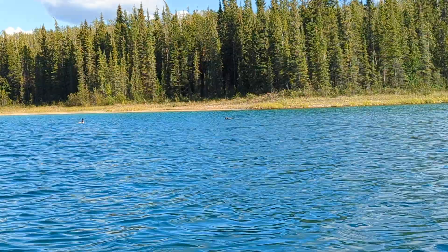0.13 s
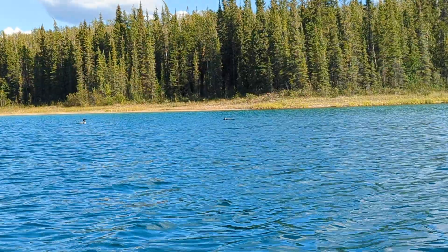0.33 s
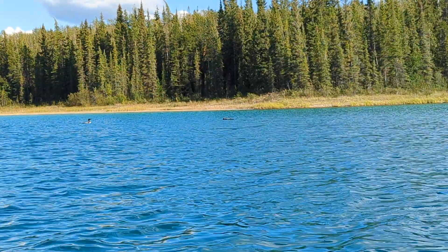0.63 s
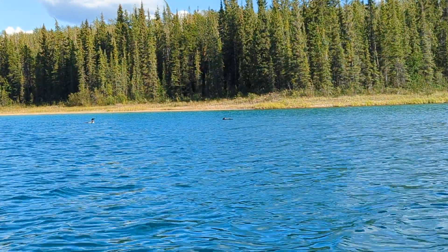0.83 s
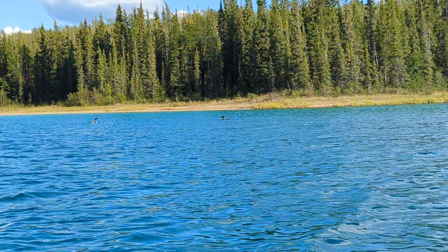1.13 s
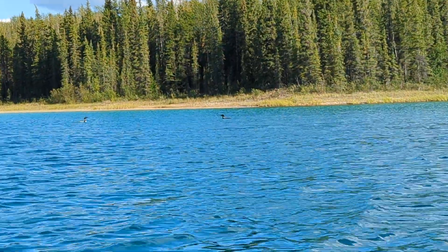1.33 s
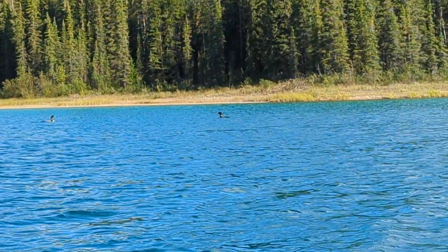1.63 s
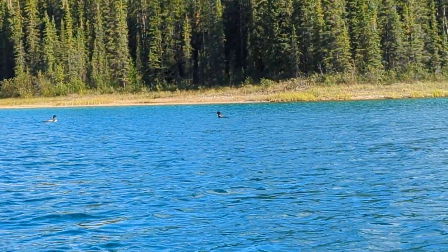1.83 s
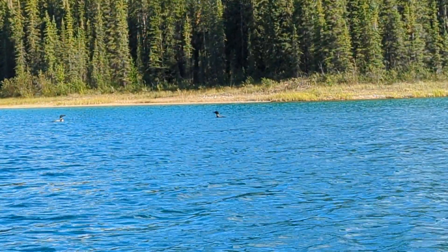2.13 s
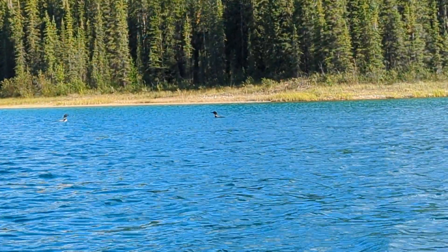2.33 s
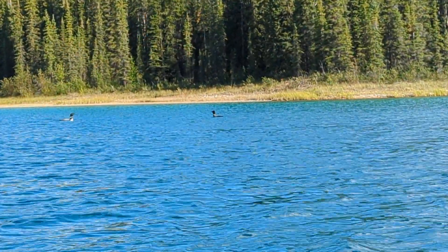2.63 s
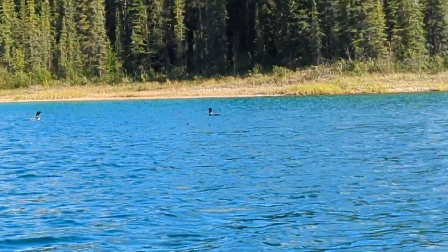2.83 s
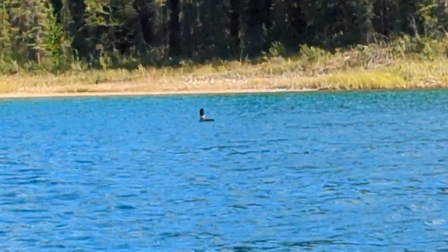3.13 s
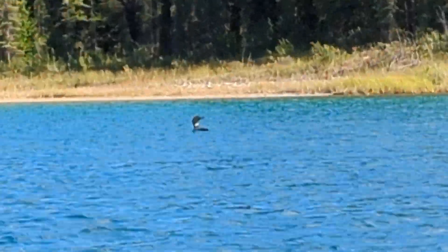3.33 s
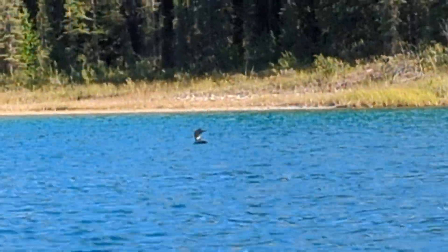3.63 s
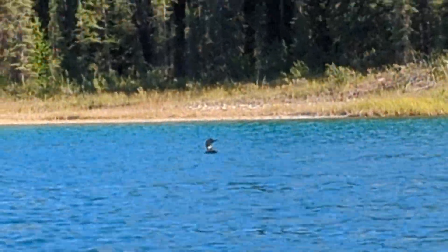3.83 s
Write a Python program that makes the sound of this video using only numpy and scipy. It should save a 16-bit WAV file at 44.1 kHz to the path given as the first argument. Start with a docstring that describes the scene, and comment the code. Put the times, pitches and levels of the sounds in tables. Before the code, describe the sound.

Three loon tremolos ring over open water, with low wind buffeting the microphone.

```python
"""Forest lake: loons call three tremolos, the middle one probably a second bird from more straight ahead.
A long faint echo returns from the wooded shore: the calls through decaying noise.
Voices: two registers of wavering sine partials plus air. Wind: noise bands and pulse runs, separate at
the two microphone ports; slaps: ringing clicks, mostly right. Water at the boat: gliding sines and
noise puffs; close brush: dense bright grains with snaps; faint hiss."""
import sys
import numpy as np
from scipy import signal
from scipy.fft import rfft, irfft
from scipy.io import wavfile
from scipy.ndimage import uniform_filter1d

SR = 44100
rng = np.random.default_rng(int(sys.argv[2]) if len(sys.argv) > 2 else 0)


def generate_wav(sig):
    """Save sig (samples, or channels by samples) to the path in sys.argv[1] as 16-bit PCM at SR."""
    pcm = np.round(np.clip(np.atleast_2d(sig).T, -1, 1) * 32767).astype(np.int16)
    wavfile.write(sys.argv[1], SR, pcm)


def linear_from_db(decibels):
    """Turn decibels (scalar or array-like) into linear amplitude factors; 0 gives 1."""
    return 10 ** (np.asarray(decibels, float) / 20)


N = 176400

# hiss spectrum: f/Hz, relative level/dB per Hz
HISS_SPECTRUM = [(820, -24), (1400, -3), (3550, -11.5), (6190, -12), (8050, -16), (12300, -18),
                 (15700, -17)]
# swells of the hiss, before flutter: start t/s, length/s, level/dB
HISS_SWELLS = [(0.557, 0.2, -78), (1.1, 3.13, -89)]
# wind at the ports: t/s, relative level/dB, left-right/dB
GUSTS = [(0.0, -49, -2), (0.02, -38, -8.5), (1.41, -51, 10), (1.85, -41, -18), (2.32, -51, 14.5),
         (3.09, -41.5, -15), (3.45, -44, 7.5), (4.0, -39.5, -12)]
# wind spectrum: f/Hz, relative level/dB per Hz
WIND_SPECTRUM = [(20, -25.5), (64, 6), (170, 5), (344, -18), (730, -45), (1200, -23), (1700, -67.5)]
# eddies bursting over one port, before panning: start t/s, length/s, level/dB, left-right/dB
BUFFETS = [(-0.02, 0.11, -42.5, -18.5), (0.168, 0.014, -32, -13), (0.291, 0.074, -44, -22),
           (0.422, 0.086, -41.5, -17), (0.703, 0.039, -46.5, 17.5), (0.881, 0.062, -55.5, -10),
           (1.696, 0.23, -53, -20.5), (2.944, 0.052, -51, -9.5), (3.083, 0.17, -42.5, -11.5),
           (3.23, 0.21, -54, 11), (3.516, 0.16, -45.5, 7.5), (3.724, 0.08, -39.5, -3.5),
           (3.84, 0.1, -45, -11.5)]
# eddy spectrum: f/Hz, relative level/dB per Hz
EDDY_SPECTRUM = [(30, -40), (70, -6), (150, 0.0), (320, -3.5), (600, -17), (1200, -40), (4500, -88)]
# hardest slaps of air: t/s, drive level before ringing and panning/dB
SLAPS = [(0.027, -44.5), (0.035, -31.5), (0.32, -28), (0.351, -32), (0.454, -30.5), (1.935, -38),
         (3.147, -29), (3.169, -30), (3.846, -34), (3.902, -30), (3.925, -33)]
# bubbles at the hull, before panning: t/s, length/s, peak level/dB, start f/Hz, end f/Hz
BUBBLES = [(0.57, 0.027, -67, 1040, 1090), (0.881, 0.023, -67, 1200, 1110), (0.876, 0.018, -60.5, 586, 650),
           (1.014, 0.012, -70, 1010, 1300), (1.05, 0.021, -74, 780, 1050)]
# small splashes, before panning: t/s, length/s, level/dB, f/Hz
SPLASHES = [(0.624, 0.028, -76, 2200), (2.502, 0.012, -58.5, 1620), (3.421, 0.027, -69, 2180)]
# brush spectrum: f/Hz, relative level/dB per Hz
BRUSH_SPECTRUM = [(900, -11.5), (4600, -14), (8500, -6.5), (12800, -3), (15500, -3.5)]
# fibres snapping during the brush: t/s, level of the shared grain before panning/dB
SNAPS = [(0.2974, -46), (0.3026, -44), (0.3069, -30.5), (0.3102, -36)]
# low register at crests and troughs, one list per stretch: t/s, pitch f/Hz, partial 1 rms/dB, partial 2 rms/dB
LOW_VOICE = [
    [(1.095, 657, -65, -68), (1.135, 752, -48, -48.5), (1.185, 650, -59, -63), (1.243, 834, -47, -45)],
    [(1.512, 629, -65.5, -68), (1.61, 617, -71.5, -84.5)],
    [(1.76, 676, -62.5, -61.5), (1.79, 789, -50.5, -39), (1.836, 643, -60.5, -59.5),
     (1.88, 890, -42.5, -33)],
    [(2.166, 730, -52.5, -51), (2.198, 792, -47.5, -41), (2.27, 588, -69.5, -74)],
    [(2.515, 715, -60.5, -55), (2.542, 767, -47, -43), (2.583, 702, -46.5, -60.5),
     (2.614, 835, -44.5, -47.5)],
    [(2.992, 663, -63.5, -78), (3.035, 608, -65, -83)],
]
# high register at crests and troughs, one list per stretch: t/s, pitch f/Hz, partial 1 rms/dB
HIGH_VOICE = [
    [(1.236, 1234, -41.5), (1.288, 935, -44), (1.338, 1227, -30.5), (1.394, 933, -43.5),
     (1.444, 1173, -33.5), (1.489, 950, -42), (1.515, 927, -57)],
    [(1.879, 1291, -32), (1.933, 983, -44), (1.982, 1292, -31.5), (2.035, 950, -46), (2.085, 1282, -30),
     (2.14, 950, -47), (2.168, 950, -59.5)],
    [(2.608, 1191, -38), (2.632, 1237, -30.5), (2.678, 980, -38.5), (2.726, 1252, -27),
     (2.778, 974.6, -35.5), (2.824, 1228, -27), (2.87, 957, -39), (2.893, 969, -41.5), (2.93, 1120, -31),
     (2.974, 951, -42.5), (3.0, 906, -55)],
]
# low overtones, before the bill: multiple of pitch, level re partial 2/dB
LOW_OVERTONES = [(3, -22.5), (4, -39.5), (5, -44), (6, -33.5), (7, -44.5), (8, -43), (9, -47)]
# high overtones, before following and bill: multiple of pitch, level re partial 1/dB
HIGH_OVERTONES = [(2, -24.5), (3, -48.5), (4, -56), (5, -54)]
# high voice repeats only every third cycle: start t/s, length/s, level of the thirds re partial 1/dB
TRIPLED = [(1.233, 0.017, -25.5), (1.333, 0.03, -28.5), (2.613, 0.037, -20), (2.728, 0.028, -23.5),
           (2.82, 0.027, -24.5)]
# partials of the tripled cycle, before the bill: multiple of pitch/3, relative level/dB
THIRDS = [(2, -1.5), (4, -1.5), (5, 2), (11, -26)]
# bill, call by call: last t/s, resonance f/Hz, overtones above about 3 kHz/dB, lag at right port/s
BILL = [(1.7, 4480, -8.5, .00008), (2.4, 5950, -3, 0.00003), (4.0, 4400, -2, 0.000068)]
# air in the voice: f/Hz, relative level/dB per Hz
BREATH_SPECTRUM = [(700, -12.5), (2000, -1), (3500, -11.5), (6500, -15.5), (15500, -32.5)]

SMOOTH_S = 0.0055


def rms_one(x):
    """Scale to rms 1."""
    return x / np.sqrt(np.mean(x ** 2) + 1e-20)


def at_hz(points, hz):
    """Read a spectrum on a log frequency axis."""
    points_hz, points_db = np.transpose(points)
    return np.interp(np.log(hz), np.log(points_hz), points_db)


def in_time(rows):
    """Columns of a curve per sample, corners rounded."""
    s, *columns = np.transpose(rows)
    t = np.arange(N) / SR
    return [uniform_filter1d(np.interp(t, s, c), int(SMOOTH_S * SR)) for c in columns]


def wavering(rows):
    """Columns per sample, joined by arches: round at the crests, narrower at the troughs."""
    roundness = 1.7   # 2 = sine-like, 1 = pointed troughs
    s, *columns = np.transpose(rows)
    place = np.interp(np.arange(N) / SR, s, np.arange(len(s)))
    k = np.minimum(place.astype(int), len(s) - 2)
    rising = columns[0][k + 1] > columns[0][k]
    height = np.sin(np.pi / 2 * np.where(rising, place - k, 1 - place + k)) ** roundness
    share = np.where(rising, height, 1 - height)
    return [uniform_filter1d(c[k] + share * (c[k + 1] - c[k]), int(SMOOTH_S * SR)) for c in columns]


def gate(start_s, length_s, edge_s):
    """1 within the span, with soft edges."""
    t = np.arange(N) / SR
    inside_s = np.minimum(t - start_s, start_s + length_s - t)
    return np.sin(np.pi / 2 * np.clip(inside_s / edge_s + .5, 0, 1)) ** 2


def drift(rate_hz):
    """Slow chance, spread 1: noise through two equal poles, run at SR / 40."""
    r = np.exp(-80 * np.pi * rate_hz / SR)
    slow = signal.lfilter([1], [1, -2 * r, r * r], rng.standard_normal(N // 40 + 2002))
    slow = slow[2000:]   # settled part
    return np.interp(np.arange(N) / 40, np.arange(len(slow)), rms_one(slow))


def coloured(x, spectrum):
    """Give a white signal a spectrum; rms 1."""
    hz = np.maximum(np.arange(N // 2 + 1) * SR / N, 1)
    return rms_one(irfft(rfft(x) * linear_from_db(at_hz(spectrum, hz)), N))


def band_passed(x, order, edges_hz):
    """Butterworth band-pass."""
    return signal.sosfilt(signal.butter(order, edges_hz, "band", fs=SR, output="sos"), x)


def sides(pan_db):
    """Left and right gains, pan_db apart."""
    return linear_from_db(np.array([[.5], [-.5]]) * pan_db)


def placed(x, pan_db, lag_s):
    """Pan by level; the right side is delayed."""
    hz = np.arange(N // 2 + 1) * SR / N
    late = irfft(rfft(x) * np.exp(-2j * np.pi * hz * lag_s), N)
    return np.array([x, late]) * sides(pan_db)


def hiss():
    """Lake and microphone: steady coloured noise plus fluttering swells."""
    swells = sum(linear_from_db(db) * gate(s, length_s, .5 * length_s) for s, length_s, db in HISS_SWELLS)
    level = linear_from_db(-84.5) + swells * linear_from_db(3.0 * drift(30))
    return level * coloured(rng.standard_normal((2, N)), HISS_SPECTRUM)


def shore(calls):
    """Scattering from trees: dying tail, swell from the far bank, remnant of an earlier call."""
    echo_db, echo_t60_s, echo_rise_s, echo_cut_hz = -35, 6.7, 0.087, 3300
    far_s, far_width_s, far_db = 0.67, 0.13, -3
    earlier_db, earlier_t60_s, earlier_hz = -78.5, 12, (950, 1220)
    t = np.arange(N) / SR
    shape = linear_from_db(-60 * t / echo_t60_s) * (1 - np.exp(-t / echo_rise_s))
    shape += linear_from_db(far_db) * np.exp(-((t - far_s) / far_width_s) ** 2)
    tail = signal.lfilter(*signal.butter(1, echo_cut_hz, fs=SR), rng.standard_normal((2, N)) * shape)
    tail = linear_from_db(echo_db) * tail / np.sqrt(np.sum(tail ** 2) / 2)
    earlier = rms_one(band_passed(rng.standard_normal((2, N)), 4, earlier_hz))
    earlier = earlier * linear_from_db(earlier_db - 60 * t / earlier_t60_s)
    return signal.fftconvolve(tail, calls[None])[:, :N] + earlier


def wind():
    """Lumpy noise in half-octave bands, separate at each port; a stronger gust is brighter."""
    brighten_db_per_oct, lump_db, flicker_db = 0.36, 5, 5   # brightening: per dB of gust
    level_db, pan_db = in_time(GUSTS)
    # hold the mean amplitude of the two ports against panning
    level_db = level_db - 10 * np.log10((linear_from_db(pan_db) + linear_from_db(-pan_db) + 2) / 4)
    out, edges_hz = np.zeros((2, N)), 20 * 2 ** np.arange(0, 7.1, .5)
    for side, sign in enumerate((.5, -.5)):
        gust_db = level_db + sign * pan_db
        lumps, white = drift(3.74), rng.standard_normal((2, N))
        for k, (low_hz, high_hz) in enumerate(zip(edges_hz, edges_hz[1:])):
            band = band_passed(white[k % 2], 2, [low_hz, high_hz])
            octaves = max(np.log2(high_hz / 150), 0)
            db = at_hz(WIND_SPECTRUM, np.sqrt(low_hz * high_hz)) + gust_db + 13.5
            db += brighten_db_per_oct * octaves * (gust_db + 39.5)
            db += lump_db * min(0.23 + 0.19 * octaves, 1.5) * lumps + flicker_db * drift(12.9)
            out[side] += band * linear_from_db(db)
    return signal.sosfilt(signal.butter(4, 920, fs=SR, output="sos"), out)


def buffets():
    """Eddies: runs of soft pulses of uneven size, separate at each port."""
    eddies_per_s, spread_db = 420, 3.5
    struck = rng.random((2, N)) < eddies_per_s / SR
    pulses = struck * linear_from_db(spread_db * np.minimum(rng.exponential(1, (2, N)), 3))
    pulses = pulses * rng.choice([-1, 1], (2, N))
    b, a = signal.butter(1, 400, fs=SR)
    hz = np.maximum(np.arange(N // 2 + 1) * SR / N, 1)
    lagging = np.exp(2j * np.angle(signal.freqz(b, a, hz, fs=SR)[1]))   # sharp front, slower back
    eddies = coloured(irfft(rfft(pulses) * lagging, N), EDDY_SPECTRUM)
    return eddies * sum(linear_from_db(db) * gate(s, length_s, 0.038) * sides(pan_db)
                        for s, length_s, db, pan_db in BUFFETS)


def slaps():
    """Air slapping the right port: each soft pulse rings a cycle or two."""
    ring_hz, t60_s = 330, 0.0075
    clicks = np.zeros(N)
    for s, db in SLAPS:
        clicks[int(s * SR)] = linear_from_db(db)
    r, w = linear_from_db(-60 / (t60_s * SR)), 2 * np.pi * ring_hz / SR
    rung = signal.lfilter([0, np.sin(w)], [1, -2 * r * np.cos(w), r * r], clicks + 1e-18)
    return signal.lfilter(*signal.butter(3, 1000, fs=SR), rung) * sides(-27.0)


def laps():
    """Water: bubbles are short gliding tones, splashes puffs of noise in a narrow band."""
    out, t = np.zeros(N), np.arange(N) / SR
    for s, length_s, db, start_hz, end_hz in BUBBLES:
        hz = np.interp(t, [s, s + length_s], [start_hz, end_hz])
        out += linear_from_db(db) * gate(s, length_s, .5 * length_s) * np.sin(2 * np.pi * np.cumsum(hz) / SR)
    for s, length_s, db, hz in SPLASHES:
        puff = band_passed(rng.standard_normal(N), 2, [hz / 1.06, hz * 1.17])
        out += linear_from_db(db) * gate(s, length_s, .5 * length_s) * rms_one(puff)
    return out * sides(-1.5)


def brush():
    """Close brush: dense bright grains under a rounded stroke, with snaps; partly separate at the ports."""
    start_s, length_s, level_db, snap_s = 0.2897, 0.043, -50, 0.00046
    pan_db, lag_s = 4, 0.00048
    grain = rms_one(linear_from_db(1.5 * drift(450)))
    shared = coloured(rng.standard_normal(N), BRUSH_SPECTRUM)
    apart = coloured(rng.standard_normal((2, N)), BRUSH_SPECTRUM)
    stroke = linear_from_db(level_db) * grain * gate(start_s, length_s, 0.34 * length_s) ** 2
    stroke += sum(linear_from_db(db) * gate(s, snap_s, snap_s) for s, db in SNAPS)
    return stroke * (placed(shared, pan_db, lag_s) + .5 * apart)


def overtones(table, hz, turn, bill_hz, aim_db):
    """Sine partials; the high ones come and go and pass the bill's resonance."""
    width_oct, lift_db, patchy_db, patches_hz = 0.22, 9.5, 6, 18
    out = np.zeros(N)
    for k, db in table:
        high = np.clip(k * hz / 600 - 4.5, 0, 1)   # fades in from 2.7 to 3.3 kHz
        resonance_db = lift_db * np.exp(-(np.log2(k * hz / bill_hz) / width_oct) ** 2)
        up_db = high * (aim_db + patchy_db * drift(patches_hz) + resonance_db)
        out += linear_from_db(db + up_db) * np.sin(round(k) * turn)
    return out


def loons():
    """Voices: two registers of near sines with weak overtones, thirds at the crests, and a little air."""
    edge_s, wobble_db, follow = 0.0048, 1.48, 0.25   # follow: dB overtones sink per dB of high voice
    breath_db, breath_follow, rasp_db = -59.5, 0.42, -52.5   # breath_follow: exponent on effort
    tone, effort = np.zeros(N), np.zeros(N)
    tripled = sum(linear_from_db(db) * gate(s, length_s, 0.015) for s, length_s, db in TRIPLED)
    last_s, resonance_hz, high_db, _ = np.transpose(BILL)
    which = np.minimum(np.searchsorted(last_s, np.arange(N) / SR), len(last_s) - 1)
    bill = resonance_hz[which], high_db[which]
    for rows in LOW_VOICE:
        hz, first_db, second_db = wavering(rows)
        turn = 2 * np.pi * np.cumsum(hz) / SR
        on = gate(rows[0][0], rows[-1][0] - rows[0][0], edge_s)
        upper = np.sin(2 * turn) + overtones(LOW_OVERTONES, hz, turn, *bill)
        tone += on * (linear_from_db(first_db) * np.sin(turn) + linear_from_db(second_db) * upper)
        effort += on * linear_from_db(second_db)
    for rows in HIGH_VOICE:
        hz, level_db = wavering(rows)
        turn = 2 * np.pi * np.cumsum(hz) / SR
        on = gate(rows[0][0], rows[-1][0] - rows[0][0], edge_s)
        sunk = linear_from_db(follow * (level_db - level_db.max()))
        stack = np.sin(turn) + sunk * overtones(HIGH_OVERTONES, hz, turn, *bill)
        stack += tripled * overtones(THIRDS, hz / 3, turn / 3, *bill)
        tone += on * linear_from_db(level_db) * stack
        effort += on * linear_from_db(level_db)
    slow_effort = np.abs(uniform_filter1d(effort, int(.02 * SR)))
    air = linear_from_db(breath_db) * slow_effort ** breath_follow
    air = air * coloured(rng.standard_normal(N), BREATH_SPECTRUM)
    rasp = signal.lfilter([1, 0, -1], 1, rng.standard_normal(N))   # bright air, strongest on loud pulses
    air += linear_from_db(rasp_db + .5 * bill[1]) * effort * rasp
    return np.sqrt(2) * tone * linear_from_db(wobble_db * drift(47)) + air


def calls_placed(calls):
    """Bearing: each call has its own lag at the right port, the middle one the least."""
    last_s, *_, lags_s = np.transpose(BILL)
    which = np.searchsorted(last_s, np.arange(N) / SR)
    return sum(placed(calls * (which == k), 0, lag_s) for k, lag_s in enumerate(lags_s))


def scene():
    """Hiss, echo, wind, water, brush and loons."""
    calls = loons()
    air = wind() + buffets() + slaps()
    return hiss() + shore(calls) + air + laps() + brush() + calls_placed(calls)


def low_pass(x):
    """Removes everything above the highest recorded frequency."""
    return signal.sosfilt(signal.butter(12, 16460, fs=SR, output="sos"), x)


def record(dry):
    """Cut the lowest bass and the top."""
    mix = signal.sosfilt(signal.butter(2, 40, "high", fs=SR, output="sos"), dry)
    mix = signal.sosfilt(signal.cheby2(12, 60, 16000, fs=SR, output="sos"), mix)   # 60 dB down at 16 kHz
    return low_pass(mix)


dry = scene()
out = record(dry)
generate_wav(out)
```